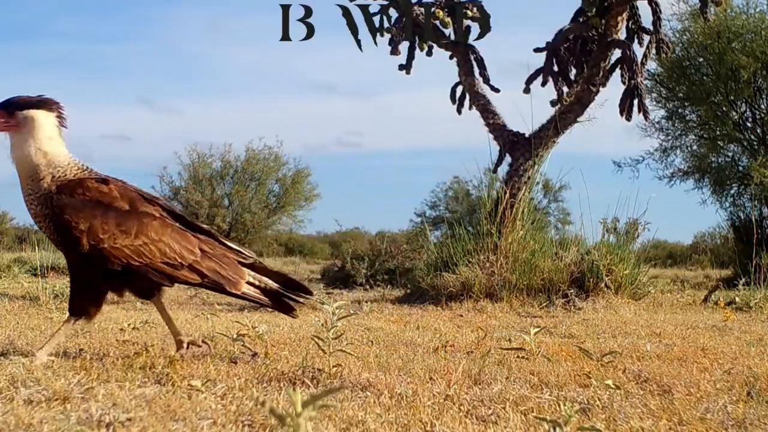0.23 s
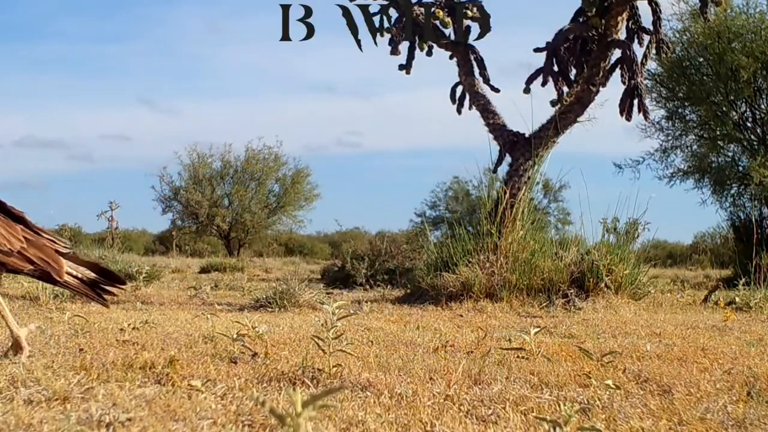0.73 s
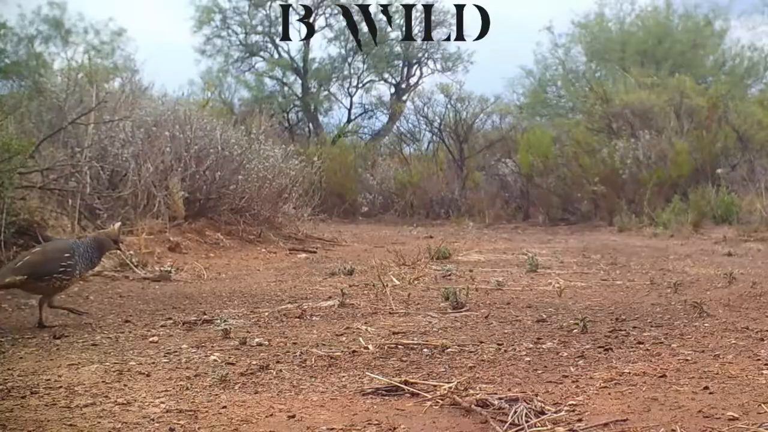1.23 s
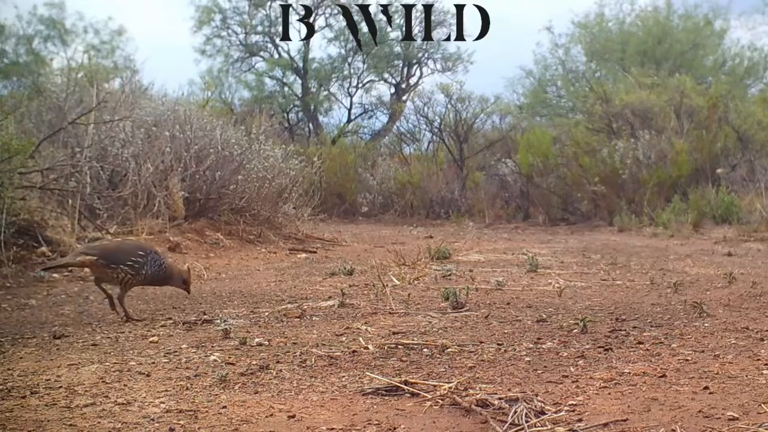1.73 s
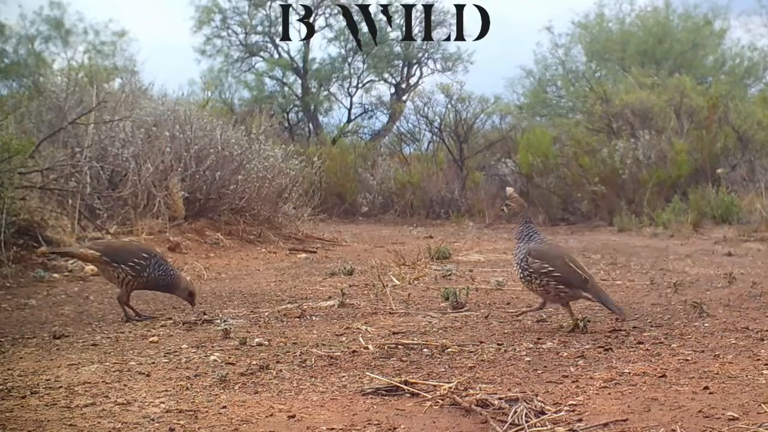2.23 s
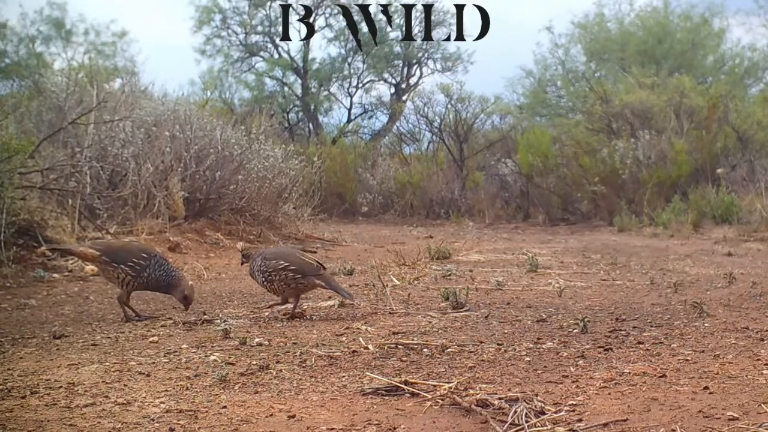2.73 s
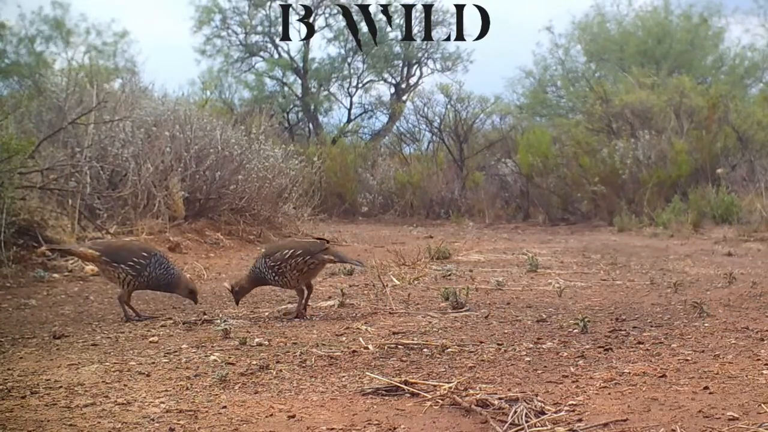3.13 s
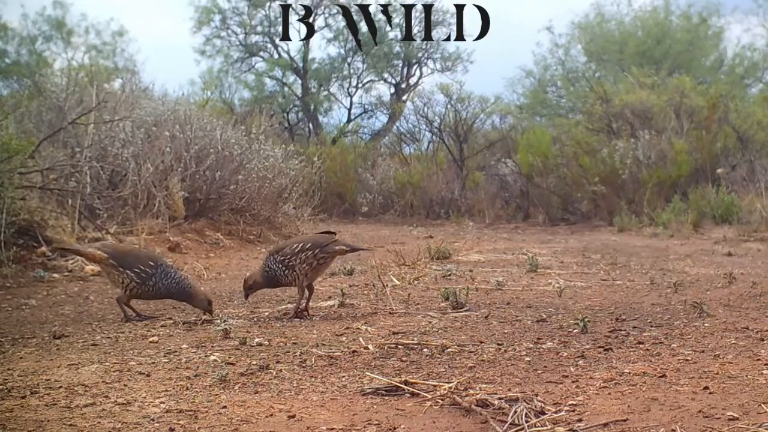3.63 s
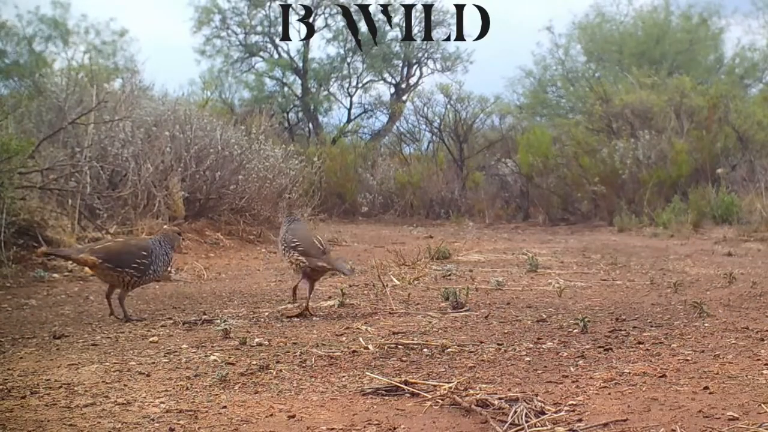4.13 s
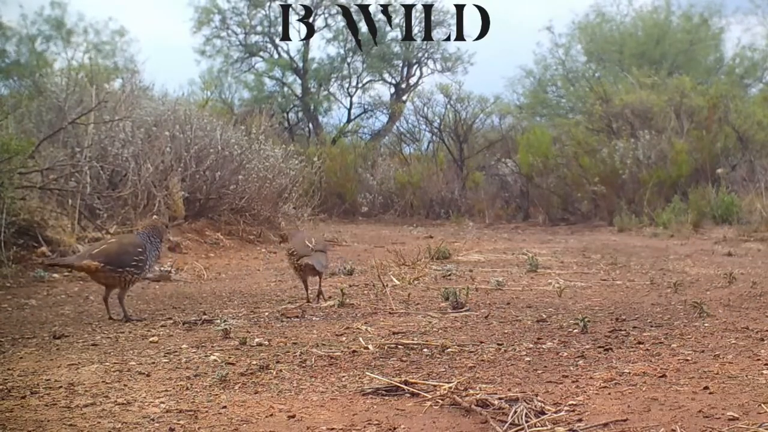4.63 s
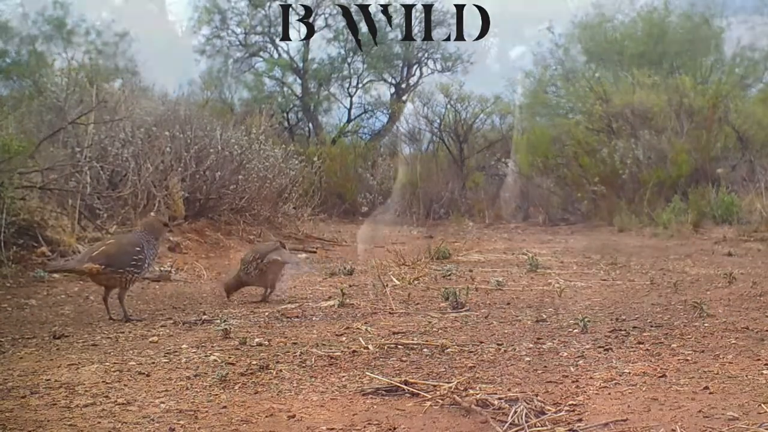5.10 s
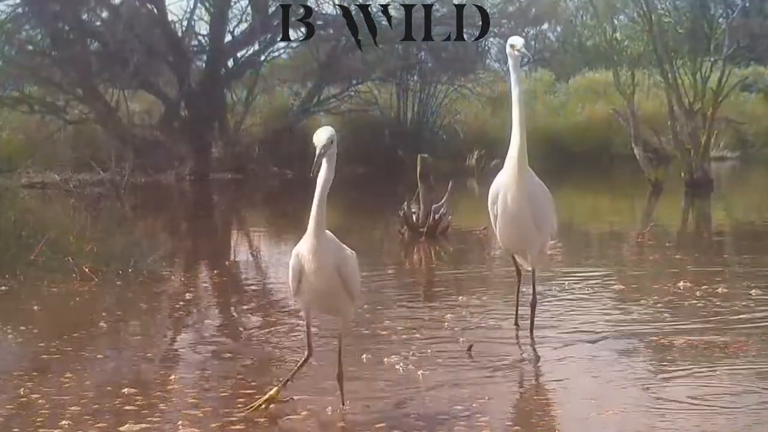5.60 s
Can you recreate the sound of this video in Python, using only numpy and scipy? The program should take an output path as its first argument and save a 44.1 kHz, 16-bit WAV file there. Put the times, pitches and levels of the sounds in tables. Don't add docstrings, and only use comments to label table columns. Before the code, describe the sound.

First come hollow clacks swelling into a rapid rattle from a nearby raptor, with a faint dove note behind. After half a second the place becomes windier: low gusts thump the microphone, bright bird whistles slide and buzz, and soft toad trills recur. Loud, short quail clucks stand out close by. Grass crackles occasionally, distant birds chirp late, and a small camera microphone adds thin hiss and whine.

```python
import sys
import numpy as np
from scipy import signal
from scipy.fft import rfft, irfft, next_fast_len
from scipy.io import wavfile
from scipy.ndimage import uniform_filter1d, map_coordinates

SR = 44100
rng = np.random.default_rng(int(sys.argv[2]) if len(sys.argv) > 2 else 0)


def decibels_to_gain(level_db):
    exponent = np.asarray(level_db, float) / 20
    return 10 ** exponent


def dump_mix(stems):
    frames = np.atleast_2d(stems).T
    limited = np.clip(frames, -1, 1)
    pcm = np.round(limited * 32767).astype(np.int16)
    wavfile.write(sys.argv[1], SR, pcm)


N = 258426
T = np.arange(N) / SR
CUT_S = .525


def unit(x):
    return x / np.sqrt(np.mean(x ** 2) + 1e-20)


def curves(rows, t=T):
    s, *cols = np.transpose(rows)
    return [np.interp(t, s, c) for c in cols]


def wobble(rate):
    knots = rng.standard_normal(int(N * rate / SR) + 4)
    return map_coordinates(knots, [T * rate])


def filtered(x, response):
    m = next_fast_len(len(x) + 8192)
    spectrum = rfft(x, m) * response(np.fft.rfftfreq(m, 1 / SR))
    return irfft(spectrum, m)[:len(x)]


def colour(points):
    f, db = np.transpose(points)
    return lambda hz: decibels_to_gain(np.interp(np.log(hz + 1), np.log(f), db))


def resonant(modes):
    def response(f):
        total = 0
        for k, (centre, width, db) in enumerate(modes):
            ring = 1j * f * width / (centre * centre - f * f + 1j * f * width)
            total = total + (-1) ** k * decibels_to_gain(db) * ring
        return total
    return response


def noise(points):
    return unit(filtered(rng.standard_normal(N), colour(points)))


def add(x, s, piece):
    part = x[round(s * SR):][:len(piece)]
    part += piece[:len(part)]


def scrub_echo(x, wet_db, t60):
    t = np.arange(SR // 3) / SR
    tail = rng.standard_normal(len(t)) * decibels_to_gain(-60 * t / t60) * (t > .004)
    return x + decibels_to_gain(wet_db) * signal.fftconvolve(x, tail / np.linalg.norm(tail))[:N]


def camera():
    # t/s, whine early in a field/dB, whine late in it/dB, hiss/dB
    camera_steps = [(0, -78, -78, -86), (.535, -71, -79, -78), (.805, -72, -72, -78), (2.34, -69, -83, -78),
                    (2.9, -71, -73.5, -78), (3.4, -70, -77, -78), (5.2, -76, -79, -78)]
    # f/Hz, level/dB
    hiss_colour = [(3000, -120), (5000, -17.5), (7000, 3), (10000, -1.5), (15700, 1), (16000, -120)]
    whine_hz, field_hz = 7797.5, 59.51
    rows = np.array(camera_steps)
    current = np.searchsorted(rows[:, 0], T, side="right") - 1
    early_db, late_db, hiss_db = rows[current, 1:].T
    fields = field_hz * T - np.where(T < .535, .885, .325)
    whine_db = np.where(fields % 1 < .44, early_db, late_db)
    whine_gain = uniform_filter1d(decibels_to_gain(whine_db), size=20)
    flip = np.tanh(30 * np.sin(np.pi * fields))
    whine = np.sqrt(2) * whine_gain * flip * np.sin(2 * np.pi * whine_hz * T)
    return whine + decibels_to_gain(hiss_db - 3.5) * noise(hiss_colour)


def wind():
    # t/s, level/dB
    scrub_levels = [(0, -57), (.29, -62), (.46, -56.5), (.85, -52), (1.43, -54.5), (3.1, -54.5),
                    (5.3, -56.5), (5.86, -53.5)]
    # t/s, level/dB
    breeze_levels = [(0, -78), (.515, -78), (.545, -60), (1, -56), (2.8, -55), (3.3, -50), (3.8, -58),
                     (4.2, -58), (4.39, -72), (4.6, -59), (4.88, -66), (5.1, -57), (5.86, -52)]
    # peak t/s, half length/s, rumble level/dB, slap over rumble/dB
    gusts = [(0.64, 0.023, -48, -7), (0.687, 0.15, -50.5, -26.5), (1.055, 0.05, -41.5, -19),
             (1.192, 0.024, -42, -19), (1.29, 0.037, -44, -13), (1.437, 0.015, -34, -0.5),
             (1.574, 0.0378, -41, -8), (1.705, 0.039, -35, -5.5), (1.805, 0.022, -51, -20),
             (1.981, .08, -62, -4), (2.097, 0.0083, -35, 4.5), (2.174, 0.044, -45.5, -18),
             (2.238, 0.019, -40, -10), (2.355, 0.11, -58, 0), (2.676, 0.03, -59, -14),
             (2.883, 0.016, -31.5, 8.5), (2.918, 0.045, -34.5, 9.5), (3.063, 0.075, -34.5, -13),
             (3.166, 0.042, -39.5, 15.5), (3.354, 0.098, -45, -2), (3.475, 0.039, -35, -2.5),
             (3.627, 0.03, -45.5, -1.5), (4.991, 0.041, -49, -20), (5.231, .06, -41, -9),
             (5.513, 0.136, -47.5, -8), (5.636, 0.027, -39, 11.5), (5.737, 0.095, -44, -4.5),
             (5.85, .06, -40, -2.5)]
    # f/Hz, level/dB
    rumble_colour = [(12, -33), (25, -5), (50, 4.5), (95, -0.5), (155, -2.5), (250, -14), (400, -61.5),
                     (700, -120)]
    slap_colour = [(53, -35), (90, -4), (296, -3.5), (551, -17), (937, -30), (1070, -44), (1500, -28.5),
                   (1950, -65), (3300, -120)]
    scrub_colour = [(120, -30), (200, -2.5), (390, -2), (550, 0.5), (1100, -0.5), (2270, -8), (3200, -15),
                    (4000, -21.5), (5000, -30), (6300, -37), (8000, -46.5)]
    gust_fall_db, squareness = 9, 1.46
    slap_floor_db, slap_follows = -67, .12

    breeze_db, = curves(breeze_levels)
    s, half, gust_db, slap_db = np.transpose(gusts)[..., None]
    coarse = T[::32]
    shape_db = gust_db - gust_fall_db * (np.abs(coarse - s) / half) ** squareness
    shape_db = np.where(coarse > CUT_S, shape_db, -120)
    gust_rumble = decibels_to_gain(shape_db).max(axis=0)
    gust_slap = decibels_to_gain(shape_db + slap_db).max(axis=0)
    rumble_gain = decibels_to_gain(breeze_db) + np.interp(T, coarse, gust_rumble)
    slap_floor = decibels_to_gain(slap_floor_db + slap_follows * (breeze_db + 50))
    slap_gain = slap_floor + np.interp(T, coarse, gust_slap)

    lump = wobble(22)
    rumble = unit(noise(rumble_colour) * decibels_to_gain(lump + 2.3 * wobble(50)))
    slap = unit(noise(slap_colour) * decibels_to_gain(lump + 3.2 * wobble(80)))
    far_db = curves(scrub_levels)[0] + 6.5 + 0.45 * wobble(7) + 0.4 * wobble(40)
    return rumble_gain * rumble + slap_gain * slap + noise(scrub_colour) * decibels_to_gain(far_db)


def rustles():
    # t/s, peak level/dB, centre f/Hz, length/s; the first row is the tick at the scene change
    puffs = [(0.535, -63, 6920, 0.0055), (0.799, -73, 3530, .008), (0.809, -62, 3550, 0.014),
             (0.858, -56.5, 3420, 0.015), (0.956, -54, 3110, 0.02), (1.056, -66.5, 3430, 0.0197),
             (2.007, -67.5, 5190, 0.003), (3.218, -69, 5120, 0.0155), (4.345, -48, 930, 0.067),
             (5.139, -47, 1620, 0.0202), (5.253, -58, 4000, .004), (5.307, -40.5, 1440, 0.0048)]
    out = np.zeros(N)
    for s, db, hz, length in puffs:
        n = round(2 * length * SR) + 16
        puff = filtered(rng.standard_normal(n), lambda f: np.exp(-(np.log((f + 1) / hz) / 0.49) ** 2))
        add(out, s - length, decibels_to_gain(db) * unit(puff) * np.hanning(n))
    return out


def toad():
    # first pulse t/s, end t/s, level/dB, swell/s
    purrs = [(0.782, 1.042, -59, .12), (1.58, 1.834, -59, 0.042), (2.367, 2.625, -58.5, 0.028),
             (3.146, 3.41, -58.5, 0.085), (3.977, 4.217, -58, 0.042), (4.799, 5.011, -53.5, 0.015),
             (5.47, 5.717, -53, .07)]
    # f/Hz, width/Hz, level/dB
    sac_modes = [(1735, 130, 7.5), (2170, 150, 2.5), (2750, 220, -11), (3390, 100, -21)]
    sac_low_modes = [(1160, 180, 5.5)]
    out = np.zeros(N)
    for s, end, db, swell in purrs:
        rate = 81.5 if s < 4.5 else 78
        low_db = -9 + 1.3 * (db + 55)
        t = np.arange(0, end - s, 1 / SR)
        gate = np.exp(3.6 * (np.cos(2 * np.pi * (rate * t - .3)) - 1))
        clicks = np.diff(np.floor(5 * rate * t), prepend=0)
        taps = gate * (rng.standard_normal(len(t)) * .07 + clicks)
        call = unit(filtered(taps, lambda f: resonant(sac_modes)(f) - decibels_to_gain(low_db) * resonant(sac_low_modes)(f)))

        def rising(f):
            delay = np.exp(-1j * np.pi * 2.5e-6 * (f - 1900) ** 2)
            return delay * f ** 4 / (f ** 4 + 1050.0 ** 4) / (1 + (f / 3800) ** 8)

        call = filtered(call, rising)
        swell_in = np.clip(t / swell, .3, 1)
        stop = np.clip((t[-1] - t) / 0.022, 0, 1)
        add(out, s, decibels_to_gain(db + 16) * call * swell_in * stop)
    return out


def whistle(notes, buzz, buzz_hz):
    attack_s, release_s, swell_db_per_s = 0.0043, 0.0053, 30
    dull_hz, dull_db_per_octave = 2800, 20.5
    out = np.zeros(N)
    for s, length, first_hz, last_hz, level_db in notes:
        t = np.arange(0, length, 1 / SR)
        hz = first_hz + (last_hz - first_hz) * t / length
        dulling_db = dull_db_per_octave * np.log2(np.maximum(hz / dull_hz, 1))
        db = level_db + swell_db_per_s * (t - length / 2) - dulling_db
        chop = 2 * np.pi * buzz_hz * (s + t)
        phase = 2 * np.pi * np.cumsum(hz * (1 + 0.089 * buzz * np.cos(chop))) / SR
        edge = np.clip(np.minimum(t / attack_s, (length - t) / release_s), 0, 1)
        add(out, s, np.sqrt(2) * decibels_to_gain(db) * edge * (1 + buzz * np.sin(chop)) * np.sin(phase))
    return out


def songbird():
    # start t/s, length/s, first f/Hz, last f/Hz, level/dB
    held_notes = [(.77, 0.017, 2340, 2500, -44.5), (.827, 0.14, 2540, 2503, -36.5),
                  (1.183, 0.0774, 3380, 3510, -38.5), (1.185, 0.073, 3200, 3290, -43.5),
                  (1.315, 0.026, 4150, 4100, -49.5), (1.342, 0.062, 4186, 4260, -36),
                  (1.435, 0.027, 2433, 2478, -31.5), (1.545, 0.04, 5620, 5870, -47),
                  (1.602, 0.013, 3800, 3460, -35), (1.635, 0.063, 2012, 1867, -31.5),
                  (1.685, 0.016, 1780, 1885, -52), (1.7, 0.0147, 3300, 3140, -32),
                  (1.718, 0.0177, 2280, 2560, -34.5), (1.755, 0.026, 1150, 1076, -46.5),
                  (1.793, 0.022, 872, 875, -44.5), (1.97, 0.048, 796, 900, -50),
                  (2.045, 0.056, 3573, 3496, -30.5), (2.115, 0.013, 2740, 2663, -37.5),
                  (2.183, .018, 950, 842, -42.5), (2.2, 0.036, 4070, 3930, -51.5),
                  (2.652, 0.021, 856, 886, -41.5), (2.656, 0.0144, 1680, 1730, -44.5),
                  (2.696, 0.033, 2650, 2800, -57)]
    slides = [(1.576, 0.0254, 5740, 3670, -39.5), (1.976, 0.0542, 2050, 3315, -31),
              (1.981, 0.025, 1800, 2470, -33), (2.127, 0.017, 4450, 3680, -32.5),
              (2.149, .033, 3350, 2558, -42.5), (2.173, 0.021, 2625, 1644, -39),
              (2.67, .017, 950, 2510, -49.5)]
    far_birds = [(1.975, .045, 3520, 3700, -50), (2.35, .12, 5300, 5620, -62), (4.3, .09, 4050, 3800, -62),
                 (4.978, .052, 4550, 3650, -54), (5.24, .045, 3880, 4230, -51),
                 (5.285, .075, 4260, 4160, -57), (5.373, .024, 3880, 3600, -48),
                 (5.428, .024, 3560, 3200, -59), (5.525, .021, 4750, 3750, -52),
                 (5.553, .036, 4750, 3200, -52), (5.608, .08, 4190, 4130, -60),
                 (5.446, .009, 3050, 2250, -55)]
    dove = [(.1, .17, 585, 587, -54.5)]
    buzzed_notes = [(1.398, 0.041, 4086, 2090, -35.5), (2.02, 0.0223, 2400, 2480, -38),
                    (2.025, 0.025, 3400, 3517, -33.5), (2.145, .028, 4700, 4250, -44),
                    (2.172, 0.019, 4340, 1910, -44), (1.71, .013, 4280, 2200, -45.5)]
    clear = whistle(held_notes + slides + far_birds + dove, buzz=0, buzz_hz=0)
    buzzed = whistle(buzzed_notes, buzz=.8, buzz_hz=150)
    return (clear + buzzed) * decibels_to_gain(0.8 * wobble(100))


def falcon():
    # first clack t/s, number of clacks, spacing/s, full peak level/dB, brightness/dB
    trills = [
        (-.0589, 8, .0243, -32.5, -56),
        (.134, 1, .03, -36, -51),
        (.247, 1, .03, -34, -36),
        (0.2693, 14, .02797, -25.5, -38),
    ]
    # f/Hz, width/Hz, level/dB
    gullet_modes = [(319.7, 93, 4.5), (575, 73, 8.5), (950, 400, 0.5), (1370, 114, 9), (1900, 160, 3.5)]
    beak_modes = [(3000, 900, 9), (4000, 400, 12), (4730, 350, 3)]
    warm_up_db, warm_up_clacks, brighten_db = 6, 0.81, 1.5
    low, high = np.zeros(N), np.zeros(N)
    for first, clacks, spacing, full_db, first_bright_db in trills:
        for j in range(round(clacks)):
            s = first + j * spacing
            bright_db = first_bright_db + brighten_db * j
            db = full_db - warm_up_db * np.exp(-j / warm_up_clacks)
            for k, slap_db in enumerate([0, -2, -7]):
                puff = np.hanning(13) * decibels_to_gain(rng.normal(0, 1))
                at = s + k * .0042 + rng.normal(0, 0.00027)
                if at < 0:
                    continue
                add(low, at, decibels_to_gain(db + slap_db + 8.5) * puff)
                add(high, at, decibels_to_gain(db + bright_db + 1.5 * slap_db + 22) * np.diff(puff[::2]))
    beak = filtered(high, lambda f: resonant(beak_modes)(f) / (1 + (f / 4900) ** 12))
    return filtered(low, resonant(gullet_modes)) + beak


def quail():
    clucks = [
        (2.308, 0.03085, 886, 600, -12),
        (2.931, 0.036, 1034, 710, -13),
        (4.764, 0.043, 1001, 688, -15.5),
        (5.691, 0.035, 842, 772, -14),
    ]
    # f/Hz, width/Hz, level/dB
    throat_modes = [(793, 1660, -5), (1520, 296, 3), (2400, 300, 4), (3314, 320, -8)]
    # f/Hz, level/dB
    chest_colour = [(250, -39), (430, -38), (580, -4.5), (3300, -4), (3900, -9), (5000, -15.5), (7000, -24),
                    (10000, -25), (15700, -33.5)]
    first_hz = 720
    out, grit, sway = np.zeros(N), wobble(1500), wobble(330)
    ring = resonant(throat_modes)
    for s, length, top_hz, last_hz, db in clucks:
        u = np.linspace(0, 1, round(length * SR))
        here = slice(round(s * SR), round(s * SR) + len(u))
        opening = np.sin(np.pi * u)
        arch = first_hz + (last_hz - first_hz) * u + (top_hz - (first_hz + last_hz) / 2) * opening
        turns = np.cumsum(arch * (1 + .055 * sway[here] + .06 * grit[here])) / SR
        sizes = decibels_to_gain(2.2 * rng.standard_normal(60) + 2 * (-1) ** np.arange(60))
        size = sizes[np.round(turns).astype(int)]
        puff = np.exp(40 * (np.cos(2 * np.pi * turns) - 1))
        breath = .14 * rng.standard_normal(len(u)) * (1.2 + np.cos(2 * np.pi * turns))
        air = size * puff + breath
        wide = filtered(air * opening ** 2, ring)
        narrow = filtered(air * (1 - opening ** 2), lambda f: ring(f * 1.17) / (1 + (f / 3000) ** 2))
        voice = filtered(wide + narrow, lambda f: ((f + 1) / 1600) ** (0.1 * (db + 12)))
        squeezed = 2.5 * np.tanh(unit(voice) / 2.5)
        squeezed = unit(filtered(squeezed, colour(chest_colour)))
        add(out, s, -decibels_to_gain(db) * squeezed * np.sin(np.pi * u ** .9))
    return out


def scene():
    far = scrub_echo(songbird() + toad(), wet_db=-8.0, t60=0.079)
    near = scrub_echo(quail() + falcon() + rustles(), wet_db=-20.5, t60=0.096)
    fade = np.clip((T[-1] - T) / .006, 0, 1)
    return (fade * (near + far + wind() + camera()))[None]


def top_cut(x):
    return signal.sosfilt(signal.butter(12, 15760, fs=SR, output="sos"), x)


def record(dry):
    mix = dry + 0.14 * dry ** 2
    return top_cut(mix)


dry = scene()
out = record(dry)
dump_mix(out)
```